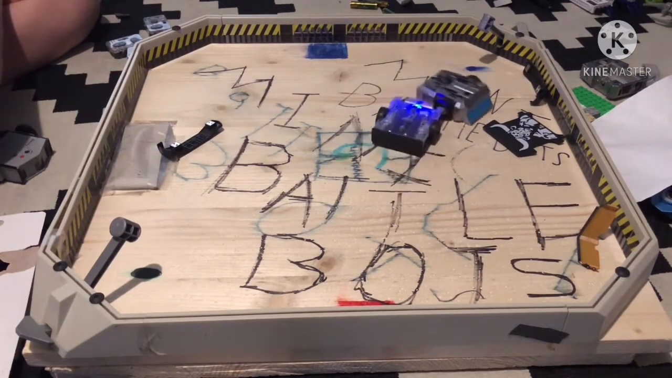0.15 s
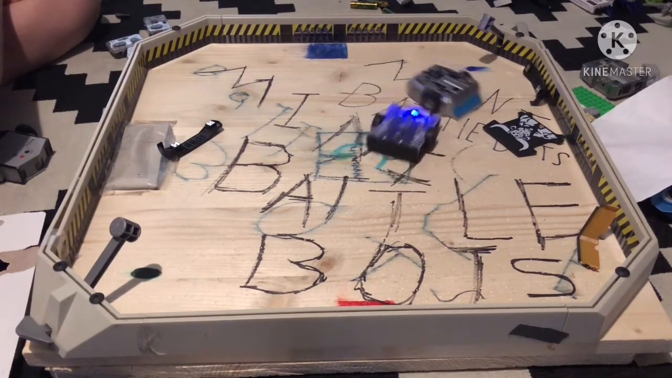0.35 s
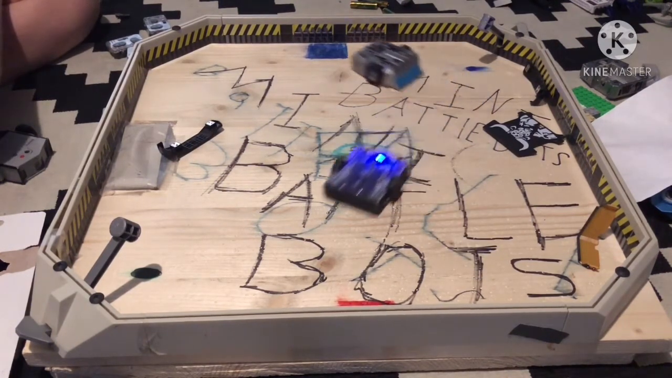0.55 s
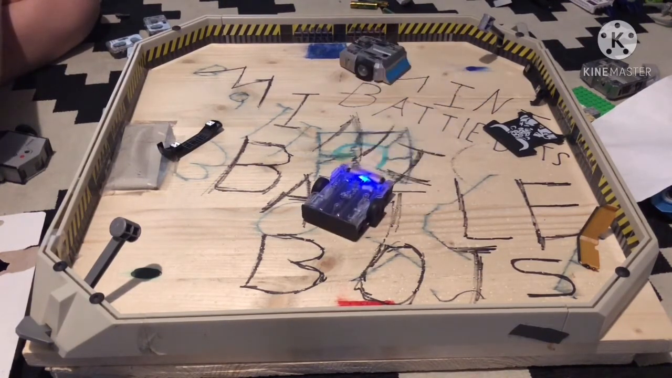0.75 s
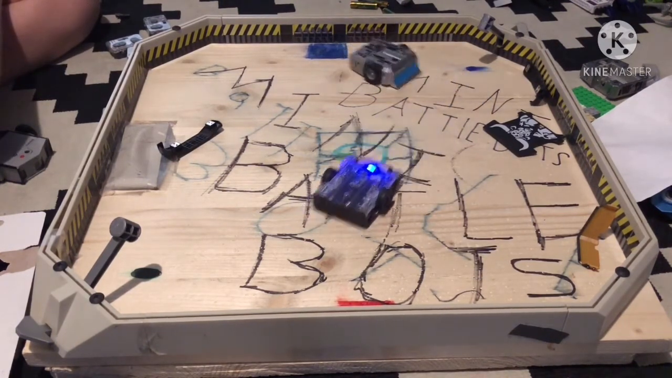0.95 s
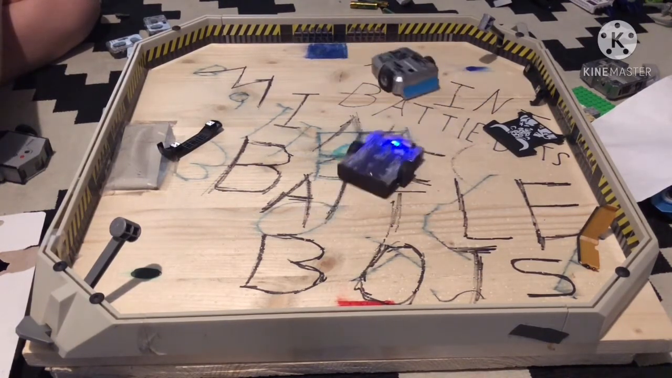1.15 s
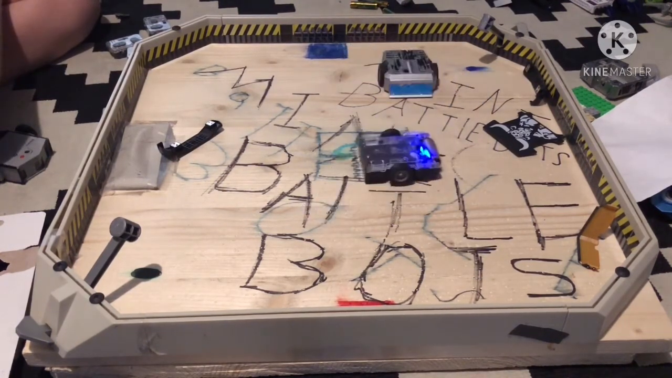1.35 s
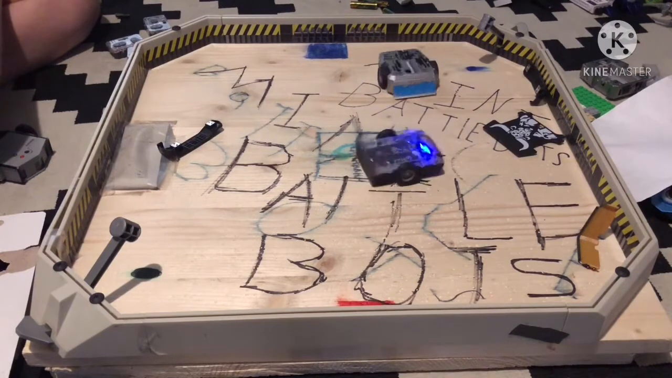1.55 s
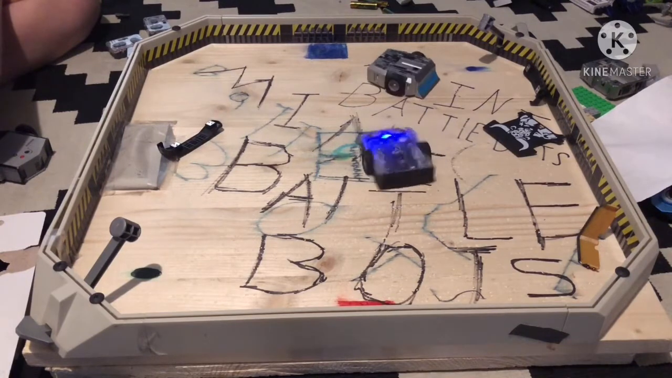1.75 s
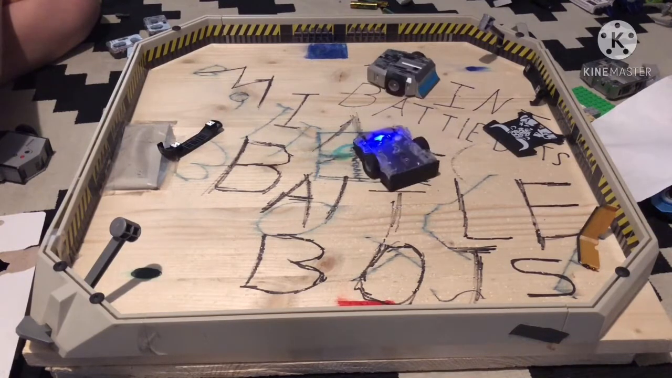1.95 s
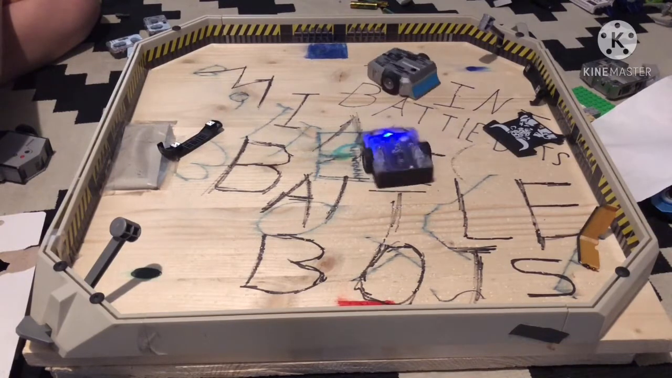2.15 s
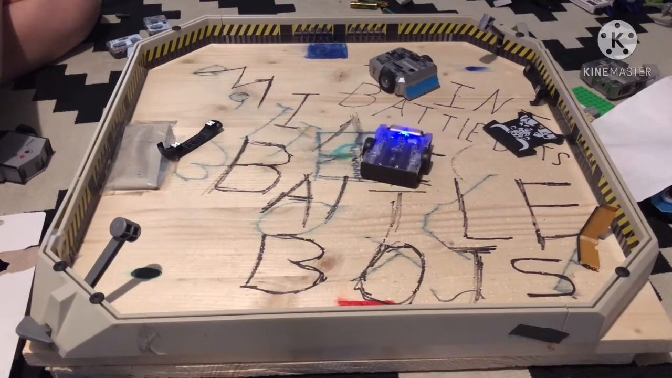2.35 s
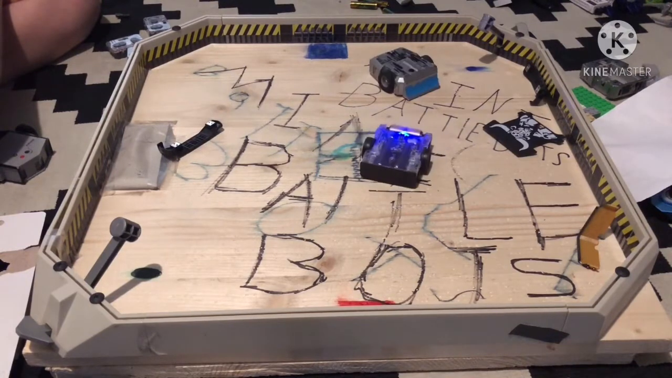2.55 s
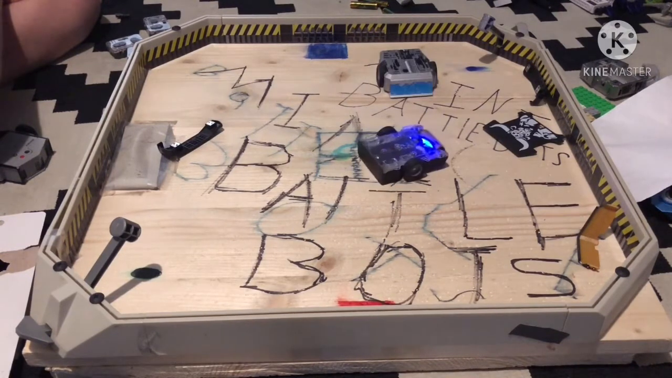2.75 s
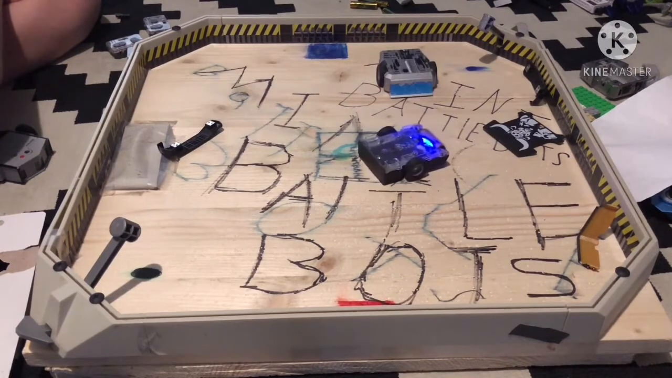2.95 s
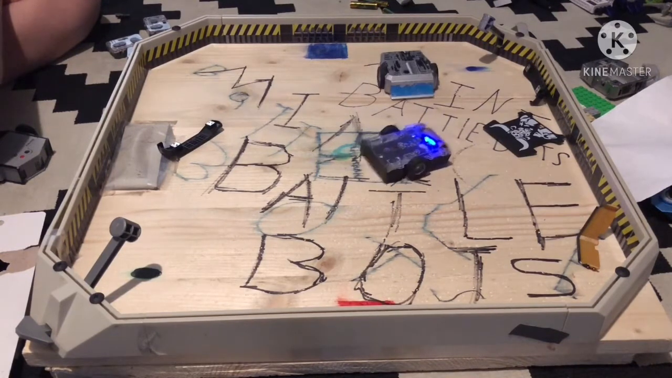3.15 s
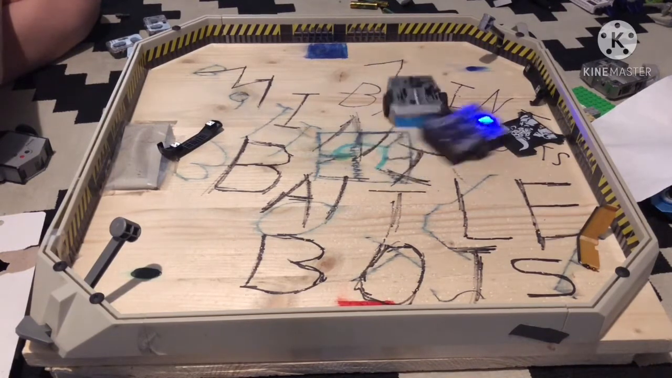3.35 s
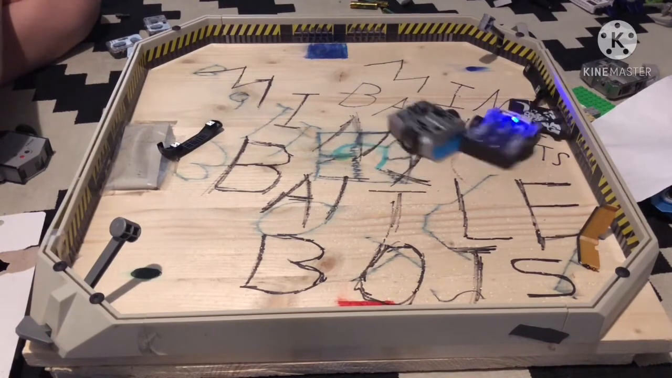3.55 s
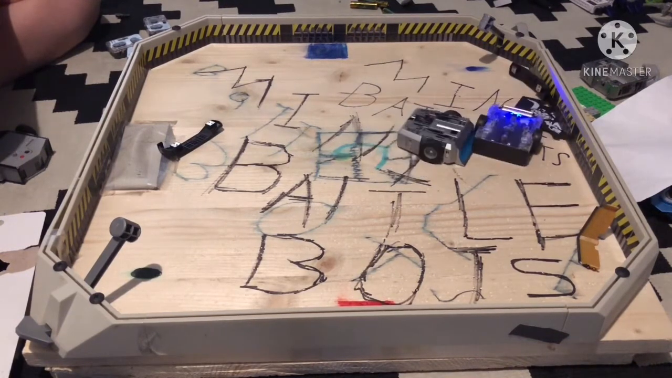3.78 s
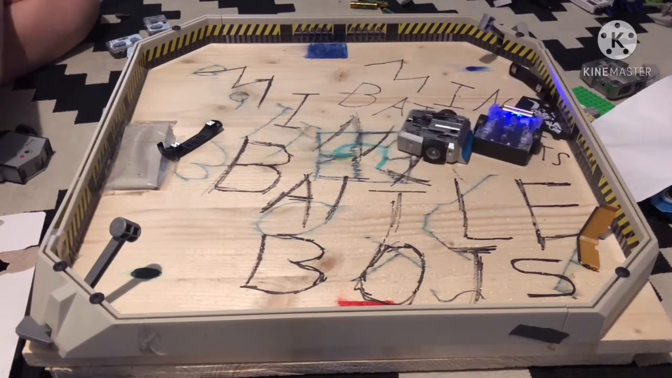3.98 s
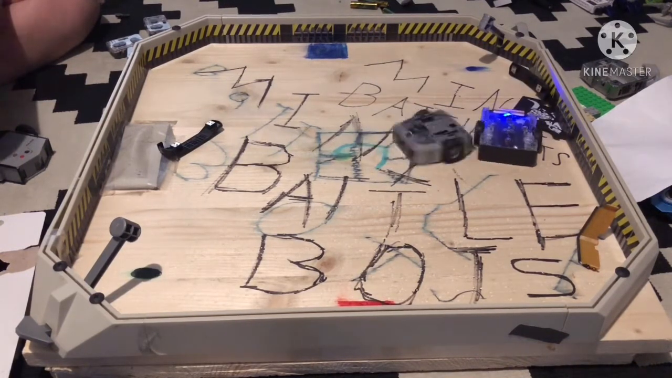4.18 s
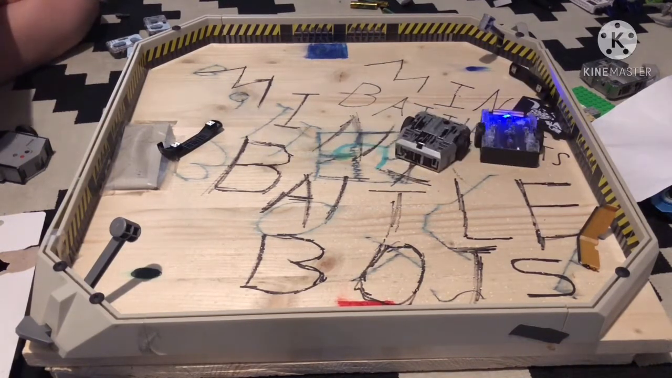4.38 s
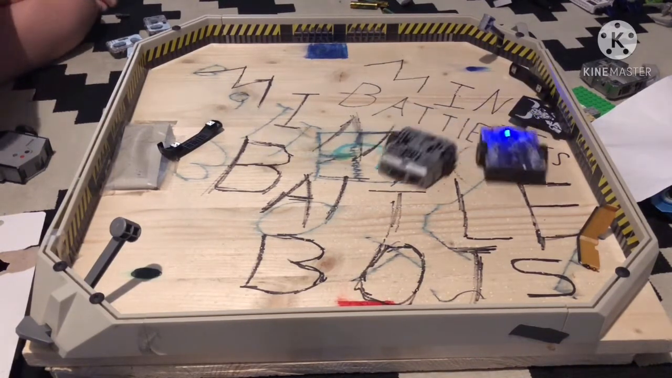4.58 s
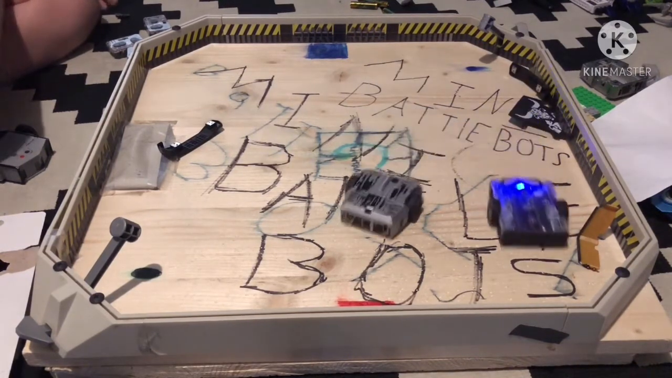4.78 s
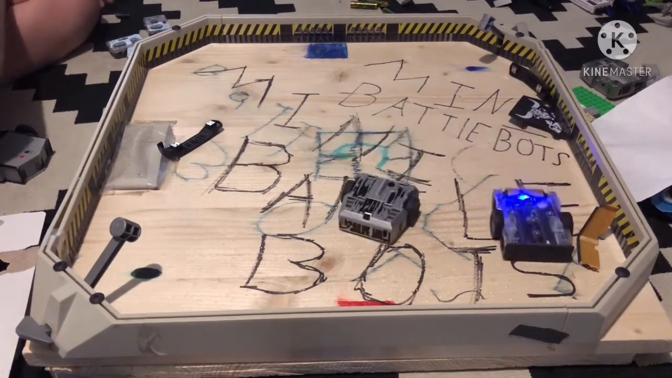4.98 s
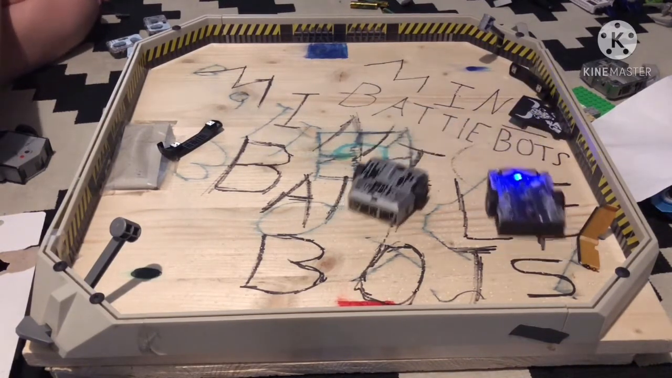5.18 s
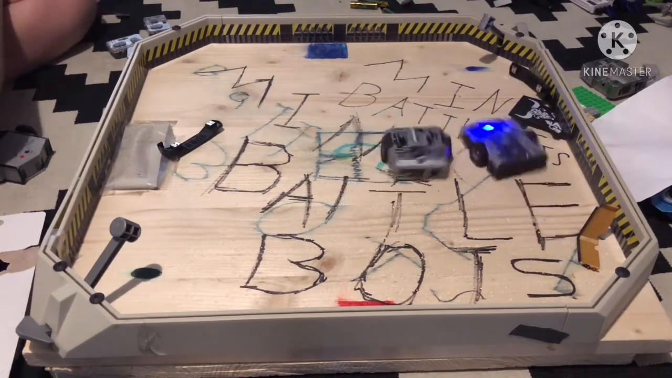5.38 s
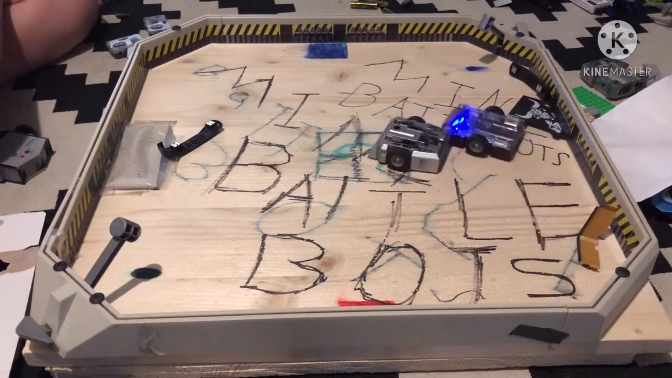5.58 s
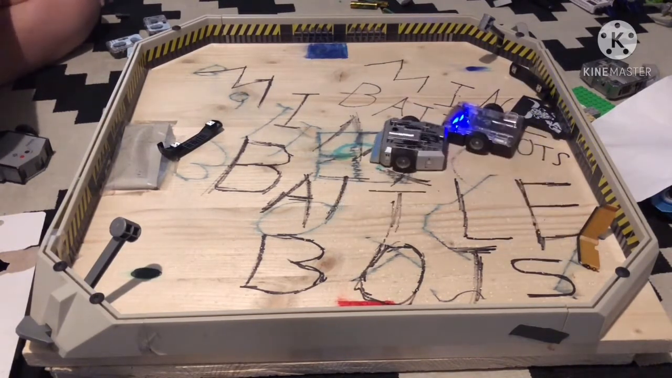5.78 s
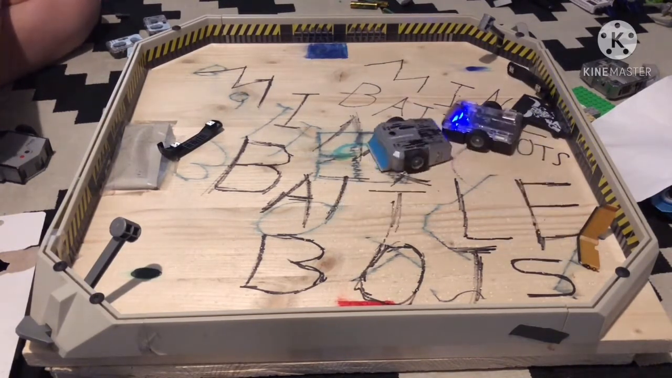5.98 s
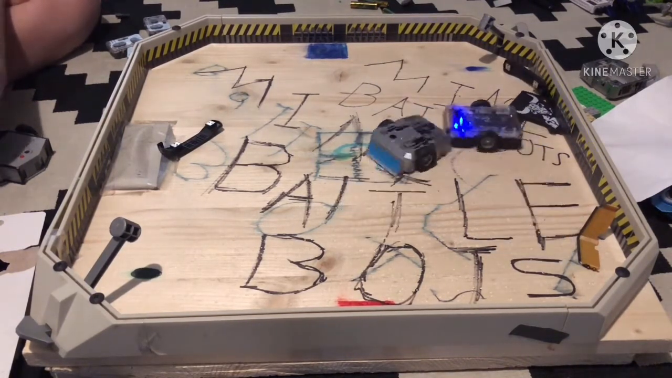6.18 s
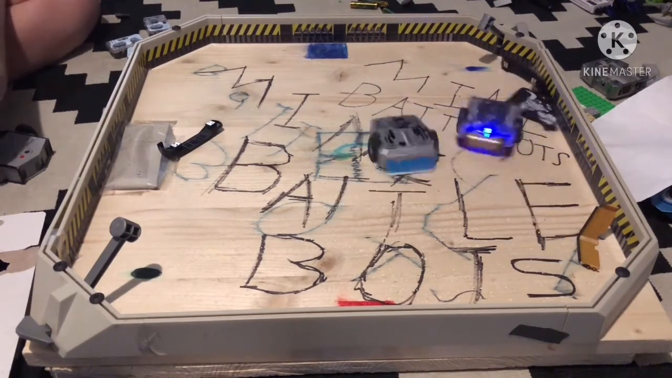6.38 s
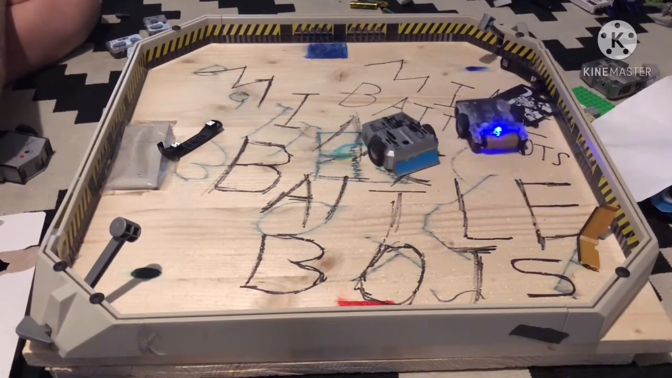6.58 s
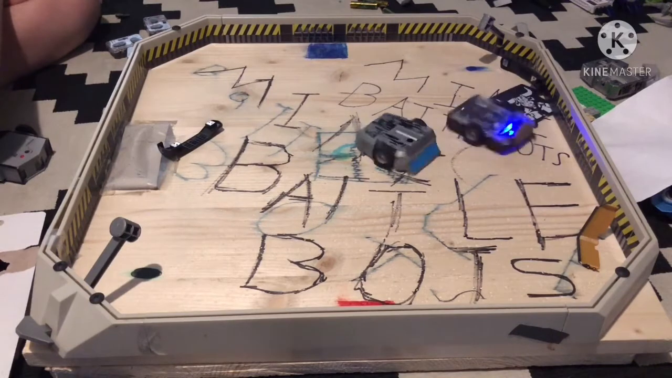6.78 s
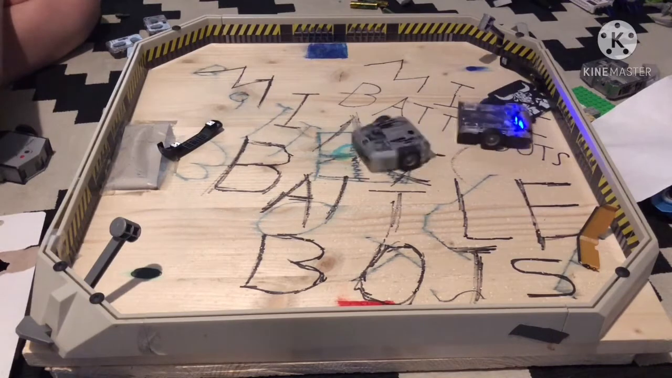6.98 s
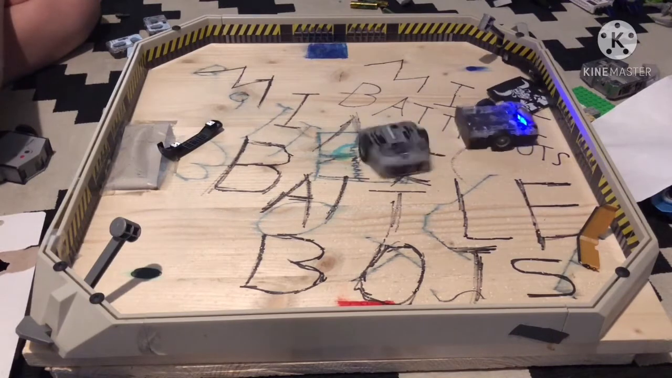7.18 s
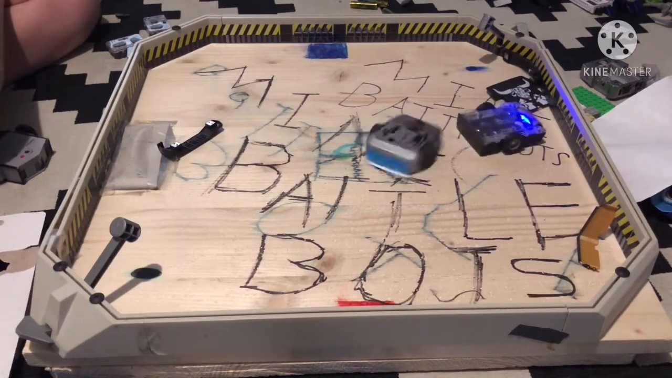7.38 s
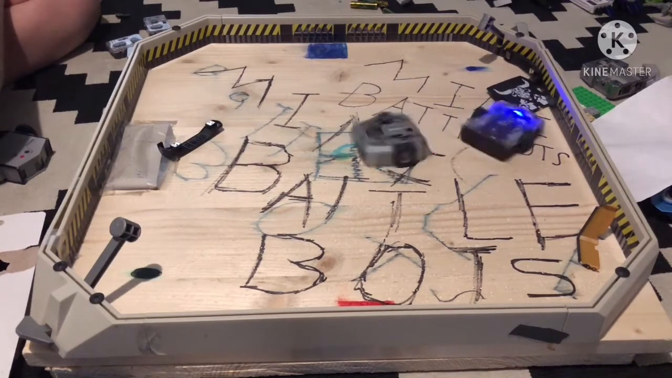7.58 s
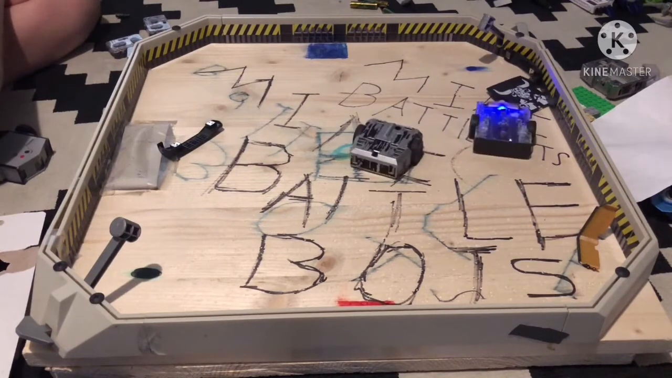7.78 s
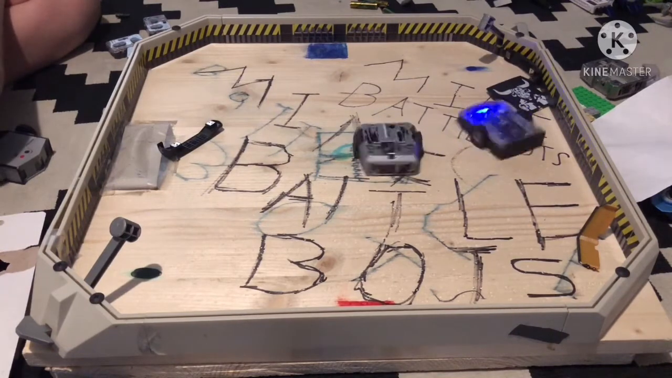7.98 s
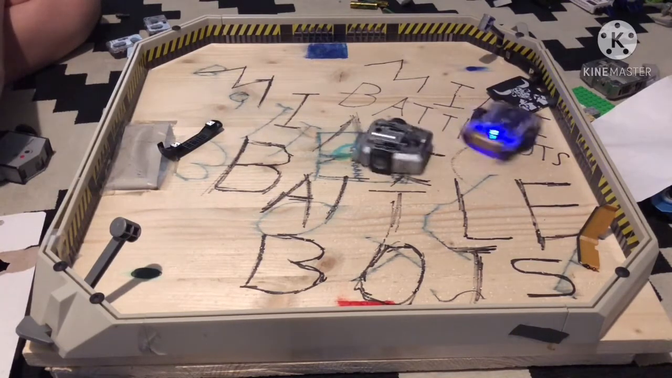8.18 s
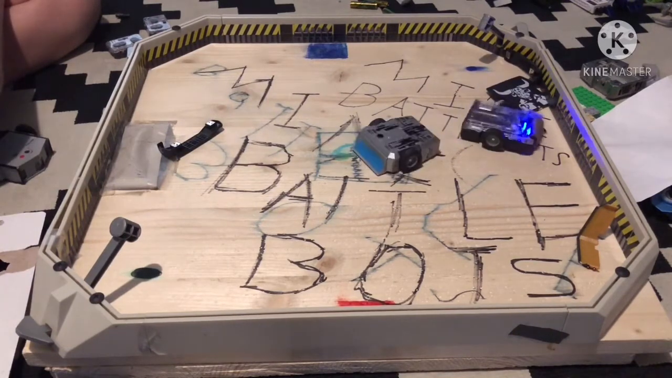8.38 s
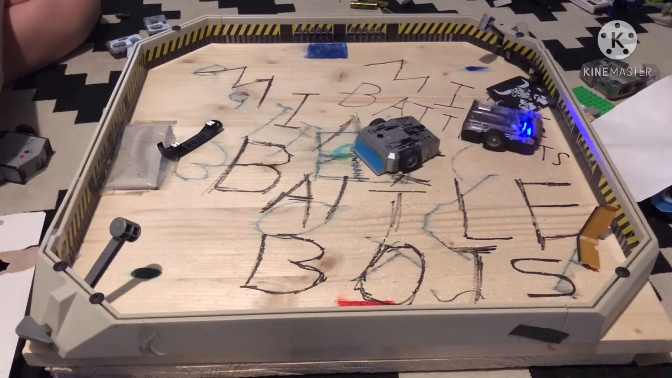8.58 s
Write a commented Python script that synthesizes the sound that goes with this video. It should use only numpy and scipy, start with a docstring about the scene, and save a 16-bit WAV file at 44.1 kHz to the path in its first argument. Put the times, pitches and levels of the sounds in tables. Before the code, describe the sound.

Close, dry sound of two small toy robots on a hollow wooden floor in a quiet room. At 0 s a clipped tail of motor and light plastic knocks, then a faint blip at 0.1 s. From 0.2 s a motor spins up within half a second to a raspy gear tick of about 120 a second, with bright rattling whirr, low wheel drumming, a nasal shell buzz and a thin sliding ring; snaps at 1.4 and 2.4 s. At 3.1 s a thump, then at 3.3-3.45 s a loud cluster of plastic cracks and board knocks. A short squeak at 3.6 s; until 4.2 s a much quieter, slow shove with faint scrapes, ending in a thud. Near silence, then a motor burst at 4.4 s and steady ticking whirr from 4.7 s to the end, wavering with turns, with snaps and knocks at 4.8-5.5 s and dull thuds near 7.3, 8.1 and 8.5 s.

```python
"""Two toy robots fight on the wooden floor of a small arena, close to one microphone in a quiet room.
First come short bursts of motor and knocks; then a worn gear ticks up to about 120 times a second,
gearboxes whirr and wheels drum on the board. Near 3.3 s plastic shells crash, and the fight moves to the wall:
a slow shove with scrapes and squeaks, a brief stop, then the motors run up again and work to the end.
Gear blows ring housing, shell and axle; noise and pushes ring board and plastic; the room echoes it all."""
import sys
import numpy as np
from scipy import signal
from scipy.io import wavfile
from scipy.ndimage import uniform_filter1d

SR = 44100
rng = np.random.default_rng(int(sys.argv[2]) if len(sys.argv) > 2 else 0)


def unload_wav(signal):
    """Save mono or channel-first audio to the path in sys.argv[1] as 16-bit WAV at rate SR, clipped to [-1, 1]."""
    wavfile.write(
        sys.argv[1],
        SR,
        np.round(np.clip(np.atleast_2d(signal).T, -1, 1) * 32767).astype(np.int16),
    )


N = 380583
TAPS = 8192  # samples in a filter response, and in a short event
TIME = np.arange(N) / SR
BINS = np.fft.rfftfreq(TAPS, 1 / SR) + 1  # Hz, raised by 1 to avoid zero
SHOVED_S = 3.5  # the fight moves from the middle of the floor to the wall
SPELL_FADE_DB_PER_S, SPELL_REST_DB = 80, -14
TICK_DECAY_S = .0009


def gain_of(db):
    """Decibels to amplitude."""
    return 10 ** (np.asarray(db) / 20)


def evened(x):
    """Scales to rms 1."""
    return x / np.sqrt(np.mean(x ** 2) + 1e-20)


def peaked(x, size):
    """Scales so that the loudest stretch of this many samples has rms 1."""
    return x / np.sqrt(uniform_filter1d(x ** 2, size).max())


def add(mix, s, sound):
    """Mixes a sound in at time s."""
    part = mix[max(round(s * SR), 0):][:len(sound)]
    part += sound[:len(part)]


def read(points, hz=BINS):
    """A spectrum joined by straight lines over log frequency."""
    f, value = np.transpose(points)
    return np.interp(np.log(hz + 1), np.log(f), value)


def curve(points):
    """The columns of a table, joined by straight lines over time."""
    s, *columns = np.transpose(points)
    return [np.interp(TIME, s, column) for column in columns]


def wander(hz):
    """Smooth chance of rms 1 that changes about hz times a second."""
    knots = rng.standard_normal(N // 8)
    return evened(np.interp(TIME * hz, np.arange(len(knots)), knots))


def colour(x, db):
    """Causal filter with the given gain on BINS: it rings after a blow, never before."""
    log_gain = np.log(gain_of(np.r_[db, db[-2:0:-1]]))
    minimum_phase = np.exp(signal.hilbert(log_gain).conj())
    ring = np.fft.ifft(minimum_phase).real[:TAPS // 2]
    return signal.oaconvolve(x, ring)[:len(x)]


def resonate(x, hz, width):
    """A resonance that follows the curve hz, with steep skirts, scaled to rms 1."""
    turn = np.exp(2j * np.pi * np.cumsum(hz * np.ones(len(x))) / SR)
    r = np.exp(-np.pi * width / SR)
    slow = signal.lfilter([1], [1, -2 * r, r * r], x / turn)  # two equal poles around 0 Hz
    return evened((turn * slow).real)


def chatter(blows, decay):
    """Each blow sets off a moment of chattering noise (decay in s)."""
    power = signal.lfilter([1], [1, -np.exp(-2 / (decay * SR))], blows ** 2)
    return evened(np.sqrt(power) * rng.standard_normal(len(blows)))


def shoved(middle, wall):
    """Crossfades from a sound in the middle of the floor to the same near the wall."""
    return middle + uniform_filter1d(1. * (TIME > SHOVED_S), size=4000) * (wall - middle)


def spells(rows):
    """Pitch and dB of a part that rings in spells: each fades in, holds and fades to a faint rest."""
    db = [level - SPELL_FADE_DB_PER_S * abs(TIME - np.clip(TIME, start, stop))
          for start, stop, _, level in rows]
    hz = [float(pitch) for _, _, pitch, _ in rows]
    strongest = np.argmax(db, axis=0)
    return uniform_filter1d(np.choose(strongest, hz), size=4000), np.maximum(np.max(db, axis=0), SPELL_REST_DB)


def gliding(rows, drive, drift=.012):
    """Resonances that fade in, glide, drift and fade out as the load shifts."""
    out, detune = np.zeros(N), 1 + drift * wander(9)
    for start, stop, hz, glide, width, db in rows:
        near = (TIME > start - .3) & (TIME < stop + .3)
        t = TIME[near]
        held = np.clip(t, start, stop)
        pitch = (hz + glide * (held - (start + stop) / 2)) * detune[near]
        fade_db = -SPELL_FADE_DB_PER_S * abs(t - held)
        out[near] += gain_of(db + fade_db) * resonate(drive[near], pitch, width)
    return out


# Runs of the motors; the fourth is a slow shove, robot against robot. Levels are before swerves and trims:
# (start [s], stop [s], rise [s], coast [dB/s], first and top ticks [1/s] at full freedom,
#  tick [dB], whirr [dB], treble [dB], wheels [dB])
MOTOR_RUNS = [(0, 0.014, 0.00024, 155, 30, 33, -44, -26.5, -5, -25),
              (.1, 0.19, .01, 145, 35, 43, -62, -40, -13, -43.5),
              (.22, 3.52, 0.014, 145, 49.6, 127, -38.5, -33, 1, -34),
              (3.55, 4.175, .01, 156, 96, 97, -56, -46, -9, -46.5),
              (4.42, 4.65, 0.011, 47, 40, 85, -42, -31.5, 0, -32),
              (4.66, 8.8, 0.13, 145, 67.4, 118, -37.5, -33.5, -2.5, -33)]
# How freely the worn gear runs: (time [s], share of its speed, added tick level [dB])
GEAR_FREEDOM = [(.6, 0.97, -1), (1.15, 1, 2), (1.45, 0.95, -2), (1.8, 1.02, 2), (2.5, 0.99, 0.5),
                (3.1, .99, -2), (4.9, 0.97, -0.5), (5.3, 1.02, 0.5), (5.7, 0.97, -0.5), (6.55, 1.02, 0),
                (7.3, .98, 0), (7.7, 1.024, 0.5), (8.05, 0.99, 0), (8.6, 1, 0)]


def speed(spin_up_s=.23, run_down_s=.04):
    """Ticks per second: in each run the motor spins up towards its top speed, then runs down."""
    rate = np.zeros(N)
    for start, stop, _, _, first, top, *_ in MOTOR_RUNS:
        spin = top + (first - top) * np.exp(-np.maximum(TIME - start, 0) / spin_up_s)
        run_down = np.exp(-np.maximum(TIME - stop, 0) / run_down_s)
        rate = np.where(TIME >= start, spin * run_down, rate)
    return rate * curve(GEAR_FREEDOM)[0]


# Swerves and shoves that load the gearboxes and scrub the wheels, or ease them:
# (middle [s], half length [s], added whirr [dB], added treble [dB], added wheels [dB])
SWERVES_AND_SHOVES = [(0.42, 0.079, 5, 3, 2.5), (.7, .13, 1, -2.5, 0), (1.0, 0.18, 2, -0.5, 2),
                      (1.414, 0.071, 0, 0.5, 1.5), (1.9, .25, -2.5, 3, 0.5), (2.38, 0.043, 1.5, 0.5, 6),
                      (2.8, 0.14, 1, -2.5, 0.5), (3.196, .12, 5, -1, 4), (3.393, 0.07, -0.5, 6, 9),
                      (3.74, 0.019, -8, -4, 3), (3.785, 0.021, 6.5, 4, -7), (3.891, .03, 2.5, -2, 5),
                      (4.034, 0.09, 6.5, 3.5, 7), (4.178, 0.059, 12, 8.5, 13.5), (4.62, 0.13, 1.5, 4.5, 2),
                      (4.884, 0.092, -3, -2, -5.5), (5.175, 0.2, 2.5, 4, 1.5), (5.42, 0.12, 2.5, -0.5, 3),
                      (6.216, 0.11, 2, 2, 4), (6.55, .15, -1, 0.5, -1), (6.88, 0.14, 3.5, 1, 5),
                      (7.16, 0.1, 2, 1, 1.5), (7.417, .14, 3, 1, 2.5), (7.761, .14, -0.5, 1, -3),
                      (8.17, 0.23, 1.5, 2, 0)]


def levels(start_db=-9.5):
    """dB of tick, whirr, treble and wheels: each run rises, holds and coasts out; swerves swell on top."""
    t = TIME[::40]  # a coarse grid is enough for slow levels
    each, trebles = [], []
    for start, stop, rise_s, coast_db_per_s, _, _, tick_db, whirr_db, treble_db, wheels_db in MOTOR_RUNS:
        rise = start_db * np.exp(-np.maximum(t - start, 0) / rise_s)
        shape = rise - coast_db_per_s * np.maximum(t - stop, 0)
        each.append(np.where(t >= start, shape, -200) + np.array([[tick_db], [whirr_db], [wheels_db]]))
        trebles.append(treble_db)
    tick, whirr, roll = np.max(each, axis=0)
    treble = np.array(trebles)[np.argmax(each, axis=0)[1]]  # from the run with the loudest whirr
    load = sum(np.outer(db, np.exp(-((t - s) / half_s) ** 2)) for s, half_s, *db in SWERVES_AND_SHOVES)
    return [np.interp(TIME, t, db) for db in (tick, *(load + [whirr, treble, roll]))]


def gear_blows(slack=.035, spread_db=1.8, limp_db=-0.5, bout_db=0.9, speed_waver=.008):
    """One blow a turn, loose in time and size, limping and rasping in short bouts; also the turn count."""
    turns = np.cumsum(speed() * (1 + speed_waver * wander(4))) / SR
    count = np.floor(np.maximum.accumulate(turns + slack * wander(130)))
    size_db = spread_db * np.clip(rng.standard_normal(N), -2, 2)
    size_db += limp_db * (-1) ** count + bout_db * np.clip(wander(18), -2, 1)
    return np.diff(count, prepend=count[0]) * gain_of(size_db), turns


# Spectrum of the tick: (frequency [Hz], relative level [dB])
TICK_SPECTRUM = [(300, -31), (900, -11), (1400, 0.5), (2200, -1.5), (2900, -2), (3600, 1), (4600, -1.5),
                 (6200, -9), (8000, -9), (9400, -6), (10800, -14.5), (12000, -5), (13500, -14),
                 (16000, -14)]


def gear(blows, db, crisp=0.25):
    """The worn tooth strikes its plastic housing: a crisp click and a very short chatter."""
    strike = crisp * evened(blows) + chatter(blows, TICK_DECAY_S)
    return gain_of(db) * evened(colour(strike, read(TICK_SPECTRUM)))


# Spectrum of the gearboxes: (frequency [Hz], mid-floor relative level [dB], near-wall relative level [dB])
WHIRR_SPECTRA = [(50, -38, -38), (200, -26, -26), (650, -21.5, -22.5), (1050, -9, -6.5), (1330, 2.5, 0.5),
                 (1850, -1, 2.5), (2300, 1, -0.5), (2650, 1.5, 0.5), (2850, -1, 0), (3500, 2, 2.5),
                 (4050, 0, 0.5), (4600, -1, -1), (5500, -4, -3.5), (6340, -9, -6.5), (9000, -9.5, -9),
                 (12000, -13, -12.5), (16000, -15.5, -14)]


def gearboxes(turns, db, bright_db, teeth_per_s=4000, pulsing=0.19, decay_s=0.0016, waver_db=0.52,
              level_db=-2.5, plain_db=-5, split_hz=6000, uneven_db=3):
    """Many small, uneven teeth rattle, hardest just after each turn of the gear; hard work brightens them."""
    teeth = (rng.random(N) < teeth_per_s / SR) * rng.standard_normal(N)
    teeth *= 1 + pulsing * np.cos(2 * np.pi * turns)
    teeth *= gain_of(uneven_db * np.clip(rng.standard_normal(N), -2, 1))
    rattle = chatter(teeth, decay_s)
    hz, *places = np.transpose(WHIRR_SPECTRA)
    whirr = shoved(*[evened(colour(rattle, read(np.c_[hz, place_db]))) for place_db in places])
    top = signal.sosfiltfilt(signal.butter(2, split_hz, "high", fs=SR, output="sos"), whirr)
    brightened = whirr - top + top * gain_of(bright_db - plain_db)
    return gain_of(db + level_db + waver_db * wander(35)) * brightened


# Modes of the arena floor, by where it is driven:
# (frequency [Hz], width [Hz], mid-floor relative level [dB], near-wall relative level [dB])
BOARD_MODES = [(75, 33, -26, -23), (160, 18, -23, -22.5), (184, 19, -11.5, -11), (245.6, 27, -7.5, -7.5),
               (284, 32.4, -1.5, -0.5), (325, 14, -23, 0), (364, 13.7, 3, 3), (390, 16.2, 1.5, 2),
               (446.4, 17, -3.5, -9.5), (538, 17, -12.5, -14), (585, 29, -22, -27), (726, 16, -17, -29),
               (829, 51, -17, -13), (950, 61, -17.5, -17.5)]


def board_db(low_hz=65, high_hz=1100):
    """Floor responses mid-floor and near the wall: its modes, radiating poorly in deep bass and treble."""
    power = sum(gain_of(db)[:, None] ** 2 / (1 + ((BINS ** 2 - hz ** 2) / (BINS * width)) ** 2)
                for hz, width, *db in BOARD_MODES)
    return 10 * np.log10(power / (1 + (low_hz / BINS) ** 4) / (1 + (BINS / high_hz) ** 4) + 1e-10)


def wheels(turns, db, bumps_per_s=2000, shake=0.51, level_db=-1.0):
    """Wheel bumps and the shake of a shaft at half the gear's speed drive the board where the robots stand."""
    bumps = evened((rng.random(N) < bumps_per_s / SR) * rng.choice([-1., 1.], N))
    # harmonics 3 to 8 of the shaft's turning
    shaft = evened(sum(np.cos(np.pi * k * turns + 2 * np.pi * rng.random()) for k in range(3, 9)))
    middle, wall = [evened(evened(colour(bumps, floor_db)) + shake * evened(colour(shaft, floor_db)))
                    for floor_db in board_db()]
    return gain_of(db + level_db) * shoved(middle, wall)


# Level of the motor hum: (time [s], level relative to the run's tick [dB])
HUM_LEVEL = [(0, -27), (.75, -15.5), (1.6, -26), (5.6, -26), (8.63, -21)]


def hum(turns, flutter=0.76):
    """The motor hums once a turn, wavering in strength."""
    return gain_of(curve(HUM_LEVEL)[0]) * evened((1 + flutter * wander(25)) * np.sin(2 * np.pi * turns))


# Background hush of the room: (frequency [Hz], relative level [dB])
HUSH_SPECTRUM = [(20, -41), (70, 20), (300, 8.5), (700, -18), (3000, -14), (16000, -18)]


def quiet_room(level_db=-62):
    """Steady, mostly low noise around the microphone."""
    return gain_of(level_db) * evened(colour(rng.standard_normal(N), read(HUSH_SPECTRUM)))


# Spectrum of the clack: (frequency [Hz], relative level [dB])
CLACK_SPECTRUM = [(50, -39), (200, -16), (520, 8), (740, 3), (1000, 2), (1400, -0.5), (2000, 0),
                  (3000, -13), (6000, -18), (16000, -24)]
# Modes of the robots' plastic shells, before detuning: (frequency [Hz], relative level [dB], t60 [s])
SHELL_MODES = [(964, -1.5, .15), (1460, -3, 0.09), (1628, -2.5, 0.092), (1840, -2, 0.1), (2760, -6, 0.053)]
# Chassis knocking on the board and on each other, before trims; a longer push is duller:
# (time [s], thump level [dB], shells relative to the thump [dB], push [s])
CHASSIS_KNOCKS = [(.003, -23.5, 8, 0.00017), (.021, -26.5, 1, 0.00015), (.038, -29, 3, .00014),
                  (0.2244, -33, -10, 0.00035), (.249, -28, -11, 0.00016), (.339, -27.5, -4, .0001),
                  (.472, -26, -15, 0.00029), (.852, -22.5, -14, .0003), (3.0963, -19, -14, .00014),
                  (3.304, -16.5, -9, 0.00026), (3.324, -23, 1.5, .0001), (3.3503, -13, -2, 0.000066),
                  (3.3558, -14.5, -5.5, 0.00019), (3.376, -19, -6, 0.00012), (3.388, -12.5, -8, 0.00012),
                  (3.409, -16, -8, .00015), (3.437, -22.5, -6, .00014), (3.54, -32.5, 2, 0.00013),
                  (3.5531, -24, -6, 0.00046), (3.595, -32, 0.5, 0.00013), (3.62, -36, -2, .00014),
                  (3.7088, -29.5, -13, .0003), (4.1228, -27.5, -8.5, .0003), (4.218, -19.5, -13, 0.00034),
                  (5.098, -25, -7, .00014), (5.109, -23, -14, 0.00036), (5.326, -24.5, -17, .0004),
                  (5.431, -20.5, -18, 0.00033), (5.467, -17.5, -24, 0.00027), (6.171, -27, -4, 0.00013),
                  (6.344, -28, -1, .00014), (7.2585, -22, -24, 0.00049), (8.0959, -22, -20, 0.00053),
                  (8.5473, -23, -18, 0.00051)]


def knocks(rattle=0.021, rattle_s=0.012, clack_s=0.011, thump_db=-1, clack_db=-3.0, ring_db=-6,
           detune=0.022, bass_hz=420):
    """A short push rings the board while the shells clack, ring and rattle; the light toys stir little bass."""
    out, t = np.zeros(N), TIME[:TAPS]
    floor_db = board_db() - 10 * np.log10(1 + (bass_hz / BINS) ** 2)
    for s, db, shell_db, push_s in CHASSIS_KNOCKS:
        rattle_noise, clack_noise = rng.standard_normal((2, TAPS))
        push = t / push_s * np.exp(-t / push_s) + rattle * rattle_noise * np.exp(-t / rattle_s)
        thump = peaked(colour(push, floor_db[int(s > SHOVED_S)]), size=200)
        clack = peaked(colour(clack_noise * np.exp(-t / clack_s), read(CLACK_SPECTRUM)), size=200)
        ring = np.zeros(TAPS)
        for hz, mode_db, t60 in SHELL_MODES:
            pitch = hz * (1 + detune * rng.standard_normal())
            ring += gain_of(mode_db - 60 * t / t60) * np.sin(2 * np.pi * pitch * t)
        shells = gain_of(clack_db) * clack + gain_of(ring_db) * peaked(ring, size=200)
        add(out, s, gain_of(db) * (gain_of(thump_db) * thump + gain_of(shell_db) * shells))
    return out


# Spectrum of a snap: (frequency [Hz], relative level [dB])
SNAP_SPECTRUM = [(60, -37), (400, -19), (1500, -3), (3500, 0.5), (8000, -1.5), (12000, -0.5), (16000, 1.5)]
# Hard plastic edges snapping together: (time [s], level before trim [dB], corner above which it is dull [Hz])
EDGE_SNAPS = [(0.126, -28, 14000), (0.18, -31.5, 12100), (0.2006, -24, 14000), (1.3712, -18, 13900),
              (2.4044, -18, 9990), (3.323, -9, 20000), (3.326, -15, 20000), (3.349, -15, 16000),
              (3.3554, -10, 20000), (3.3617, 0, 20000), (3.382, -17, 18000), (3.4229, -12, 18000),
              (3.4254, -17, 18000), (3.864, -36, 7000), (3.974, -31, 8000), (4.0638, -35, 7000),
              (4.216, -29, 2501), (4.3565, -30.5, 20000), (4.781, -26, 10000), (4.84, -27, 9000),
              (4.901, -28, 10000), (4.932, -25, 12000), (5.098, -20, 9000), (5.2487, -19.5, 14990),
              (5.4145, -19, 8000), (5.4442, -16, 5000), (5.536, -21.5, 9000)]


def snaps(decay_s=.0022, tail=0.065, tail_s=0.01, level_db=-1):
    """Bright cracks of hard plastic with a faint rattle behind."""
    out, t = np.zeros(N), TIME[:TAPS // 2]
    for s, db, dull_hz in EDGE_SNAPS:
        crack = rng.standard_normal(len(t)) * (np.exp(-t / decay_s) + tail * np.exp(-t / tail_s))
        spectrum = read(SNAP_SPECTRUM) - 10 * np.log10(1 + (BINS / dull_hz) ** 4)
        add(out, s, gain_of(db + level_db) * peaked(colour(crack, spectrum), size=64))
    return out


# Spells in which a loose shell buzzes, before waver and flicker:
# (start [s], stop [s], frequency [Hz], level relative to the run's tick [dB])
SHELL_BUZZES = [(0.3, 0.71, 1574, -2), (.75, 3.2, 1499, 0), (5.3, 5.58, 1870, -6), (5.7, 6.4, 1859, -8)]


def shell(blows, width=190, decay_s=0.022, waver=0.019, flicker_db=1.2):
    """The gear keeps a loose shell buzzing unsteadily around its own resonance."""
    hz, db = spells(SHELL_BUZZES)
    buzz = resonate(chatter(np.sign(blows), decay_s), hz * (1 + waver * wander(15)), width)
    return gain_of(db + flicker_db * wander(20)) * buzz


# Spells in which a loaded gearbox whines, before drift:
# (start [s], stop [s], middle frequency [Hz], glide [Hz/s], width [Hz], level at full running [dB])
GEARBOX_WHINES = [(.32, 0.4, 2420, -600, 500, -44), (.5, 3.2, 1680, 0, 220, -48),
                  (.55, .95, 2349, 0, 449.8, -44), (3.0, 3, 3140, 0, 900, -38),
                  (3.18, 3.28, 3480, 0, 606, -35), (4.14, 4.1, 1900, -1, 350, -48),
                  (4.45, 4.57, 2380, -400, 600, -41), (4.46, 4.66, 5852, 0, 600, -45),
                  (6.15, 6.24, 3530, 0, 380.1, -35.5), (6.8, 7.1, 2750, 0, 398.9, -45),
                  (7.17, 7.5, 1550, 600, 699.9, -44), (8.1, 8.34, 3600, 0, 450, -39),
                  (8.28, 8.37, 3200, -1200, 700, -39), (8.45, 8.7, 3307, -2, 899.8, -44)]


def whines(whirr_db, running_db=-40):
    """The steady mesh of loaded gears sings in the gearbox, sinking when the whirr sinks below running_db."""
    return gain_of(np.minimum(whirr_db - running_db, 0)) * gliding(GEARBOX_WHINES, rng.standard_normal(N))


# The dry axle's song, which slides as the load shifts, before waver and flicker:
# (time [s], frequency [Hz], level of the lower mode relative to the run's tick [dB])
AXLE_SONG = [(.45, 4600, -18), (.7, 4650, -8), (.95, 4500, -14), (1.1, 4180, -3), (1.45, 4400, -18),
             (1.65, 4430, -1), (2.06, 4100, -3), (2.2, 4500, -4), (2.42, 4700, -1), (2.7, 4650, -15),
             (4.6, 4330, -13), (4.8, 4450, -4), (4.98, 4560, -3), (5.25, 4730, -13), (5.5, 4920, -3),
             (5.85, 5070, -4.5), (6.15, 5000, -6), (6.3, 5180, -3), (6.58, 5150, 0), (6.78, 5120, -4.5),
             (7.1, 5040, -4.5), (7.4, 5030, -16), (7.9, 4800, -18), (8.21, 5200, 0), (8.35, 4970, -16)]


def axle(blows, width=290, overtone=2.29, overtone_db=-8, waver=.008, flicker_db=1.5):
    """Every tick pings the axle, which rings unsteadily in two modes."""
    hz, db = curve(AXLE_SONG)
    hz = hz * (1 + waver * wander(12))
    drive = chatter(blows, TICK_DECAY_S)
    upper = gain_of(overtone_db) * resonate(drive, hz * overtone, width * overtone)
    return gain_of(db + flicker_db * wander(10)) * (resonate(drive, hz, width) + upper)


# Low tones: tyres juddering, the struck board ringing on, a loaded motor humming; before waver and flutter:
# (middle [s], half length [s], frequency at the middle [Hz], level [dB])
LOW_TONES = [(0.502, .04, 298, -44), (.9, 0.024, 294, -26), (3.378, 0.02, 333, -15),
             (3.46, 0.032, 365, -30), (3.555, 0.024, 360.3, -28.5), (3.9, 0.098, 188, -52),
             (4.245, .018, 341, -29.5), (4.88, 0.14, 292, -40)]


def low_tones(waver_hz=6, flutter=0.2, sag_hz_per_s=50):
    """A low tone swells, sags in pitch and dies."""
    out, waver, strength = np.zeros(N), waver_hz * wander(40), 1 + flutter * wander(25)
    for s, half_s, hz, db in LOW_TONES:
        turns = np.cumsum(hz + waver - sag_hz_per_s * (TIME - s)) / SR
        out += gain_of(db) * np.exp(-((TIME - s) / half_s) ** 2) * np.sin(2 * np.pi * turns)
    return np.sqrt(2) * strength * out


# Spells in which the ticks ring the gear housing, before drift:
# (start [s], stop [s], middle frequency [Hz], glide [Hz/s], width [Hz], level relative to the run's tick [dB])
HOUSING_RINGS = [(.52, .95, 3840, -300, 450, -4.5), (.98, 1.17, 3830, 500, 600, -3.5),
                 (1.22, 1.55, 3570, -500, 600, -3), (1.72, 1.93, 4040, 700, 600, -1.5),
                 (2.03, 2.55, 3740, -150, 450, -0.5), (2.6, 2.95, 3694, 0, 697.7, -6.5),
                 (3.85, 4.15, 3063, 1, 200, -1), (4.95, 5.23, 9330, 0, 1201, -4),
                 (5.48, 6.1, 3602, -60, 299.7, -8), (6.3, 6.72, 3530, -150, 329.8, -3),
                 (6.25, 6.7, 6137, 0, 500, -10), (7.58, 7.85, 3700, 400, 449.7, -1.5),
                 (7.98, 8.16, 4600, 1500, 900, -3), (8.3, 8.63, 11700, 0, 799, -10)]


def housing(blows, decay_s=0.0019):
    """The ticking gear rings the resonances of its housing."""
    return gliding(HOUSING_RINGS, chatter(np.sign(blows), decay_s))


# Spectrum of a scrape or scrub: (frequency [Hz], relative level [dB])
SCRAPE_SPECTRUM = [(100, -28), (500, -0.5), (900, 1), (1800, -4), (2800, 0), (4500, -2.5), (7000, -0.5),
                   (9500, -3), (16000, -4.5)]
# Shells scraping and clattering; dull rows are wheels scrubbing the floor:
# (start [s], length [s], level [dB], treble tilt [dB])
SCRAPES_AND_SCRUBS = [(0.836, 0.17, -38, -12), (2.325, 0.086, -38, -9), (3.1, .1, -39.5, -14),
                      (3.367, .035, -24, 9), (3.4, .055, -31, 0), (3.536, 0.044, -28, -5),
                      (3.594, 0.021, -31, -9), (3.876, .016, -46, -11), (3.968, 0.024, -46, -6),
                      (4.145, 0.054, -41, -14), (5.02, .12, -38.5, -14), (5.438, .025, -32, -9),
                      (6.838, .11, -39, -14)]


def scrapes_and_scrubs(catches_per_s=700, spread_db=4, ring_s=0.0014, edge_s=0.0059, treble_hz=5000):
    """Plastic edges or tyres catch and slip in a dense, uneven clatter."""
    out, t = np.zeros(N), TIME[:TAPS]
    for s, length, db, treble_db in SCRAPES_AND_SCRUBS:
        sizes = gain_of(spread_db * np.clip(rng.standard_normal(TAPS), -2, 2))
        catches = (rng.random(TAPS) < catches_per_s / SR) * sizes
        spectrum = read(SCRAPE_SPECTRUM) + treble_db * BINS ** 2 / (BINS ** 2 + treble_hz ** 2)
        grit = evened(colour(chatter(catches, ring_s), spectrum))
        add(out, s, gain_of(db) * np.clip(np.minimum(t, length - t) / edge_s, 0, 1) * grit)
    return out


# A gripping tyre hops on the board: (start [s], length [s], hops [1/s], level [dB])
TYRE_HOPS = [(2.331, .07, 77, -24), (3.109, .05, 70, -33), (4.151, .05, 66, -34.5)]


def hops(push_s=0.00018, uneven_db=2.5):
    """A tyre grips and jumps in a quick, evenly timed row of round thumps on the board."""
    out, t, floors = np.zeros(N), TIME[:TAPS], board_db()
    for s, length, per_s, db in TYRE_HOPS:
        since = t % (1 / per_s)  # seconds since the latest hop
        size = gain_of(uneven_db * rng.standard_normal(TAPS))[(t * per_s).astype(int)]
        pushes = size * (t - since < length) * since / push_s * np.exp(-since / push_s)
        thumps = colour(np.diff(pushes, prepend=0), floors[int(s > SHOVED_S)])
        add(out, s, gain_of(db) * peaked(thumps, size=800))
    return out


# Tyres squeak as they slip: (middle [s], half length [s], frequency before waver [Hz], peak level [dB])
TYRE_SQUEAKS = [(3.569, 0.0062, 2790, -22.5), (3.882, 0.0067, 3050, -41), (3.923, .01, 2000, -46),
                (4.06, .012, 3040, -42), (6.355, 0.03, 929, -37)]


def squeaks(waver=0.0249):
    """A tyre slips for an instant and gives a rough tone."""
    seconds = np.cumsum(1 + waver * wander(900)) / SR  # uneven time roughens the pitch
    return sum(gain_of(db) * np.exp(-((TIME - s) / half_s) ** 2) * np.sin(2 * np.pi * hz * seconds)
               for s, half_s, hz, db in TYRE_SQUEAKS)


# Echoes off the floor and the arena walls: (delay before sway [s], gain)
WALL_ECHOES = [(.00042, -0.047), (.00093, -0.028), (.0017, 0.13), (.0029, .15), (.0047, -.13), (.0071, 0.1)]


def arena(x, sway=0.1203, sway_hz=2.5):
    """Near surfaces add short echoes that comb the sound; the comb slides as the robots move."""
    return x + sum(gain * np.interp(TIME - delay * (1 + sway * wander(sway_hz)), TIME, x)
                   for delay, gain in WALL_ECHOES)


# Reverberation of the room: (frequency [Hz], t60 [s])
ROOM_DECAY = [(150, 0.26), (1000, 0.51), (4000, 0.35), (9000, 0.19), (16000, 0.032)]


def room(x, gap_s=0.00543):
    """Sparse reflections, each band dying at its own speed."""
    half = SR // 2
    taps = rng.choice([-1., 1.], half) * (rng.random(half) < 1 / 10) * (TIME[:half] > gap_s)
    hz, t, z = signal.stft(taps, SR, nperseg=256)
    tail = signal.istft(z * gain_of(-60 * t / read(ROOM_DECAY, hz)[:, None]), SR, nperseg=256)[1]
    return signal.oaconvolve(x, tail / np.linalg.norm(tail))[:N]


def scene(motor_room_db=-16, hit_room_db=-11):
    """Motors and collisions in a quiet room; near echoes comb only the gear and gearboxes."""
    blows, turns = gear_blows()
    tick_db, whirr_db, treble_db, wheels_db = levels()
    ticking = gear(blows, tick_db + curve(GEAR_FREEDOM)[1])
    motors = arena(ticking + gearboxes(turns, whirr_db, treble_db))
    motors += gain_of(tick_db) * (hum(turns) + shell(blows) + axle(blows) + housing(blows))
    motors += wheels(turns, wheels_db) + whines(whirr_db) + low_tones() + hops() + squeaks()
    hits = knocks() + snaps() + scrapes_and_scrubs()
    echoes = room(gain_of(motor_room_db) * motors + gain_of(hit_room_db) * hits)
    return (motors + hits + quiet_room() + echoes)[None]


def record(dry, low_cut_hz=42, edge_hz=15850):
    """The microphone's bass cut, an overload limit, then the band limit."""
    thin = signal.sosfilt(signal.butter(2, low_cut_hz, "high", fs=SR, output="sos"), dry)
    band = signal.firwin(511, edge_hz, window=("kaiser", 9), fs=SR)
    return signal.oaconvolve(np.clip(thin, -.85, .85), band[None], "same")


dry = scene()
out = record(dry)
unload_wav(out)
```